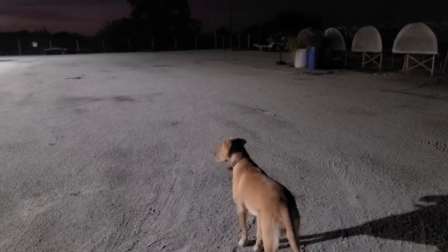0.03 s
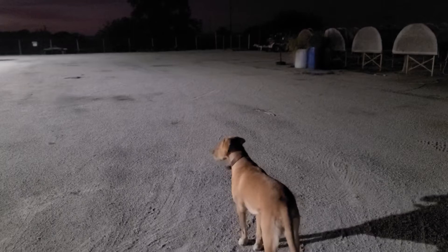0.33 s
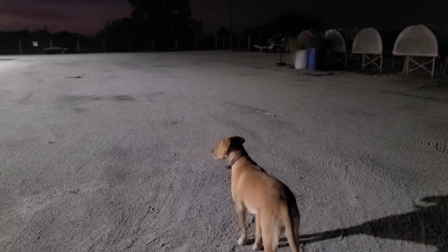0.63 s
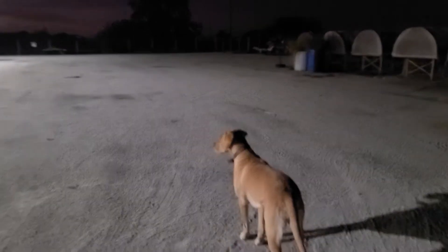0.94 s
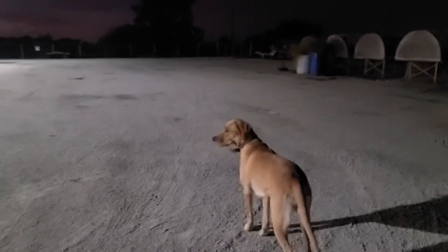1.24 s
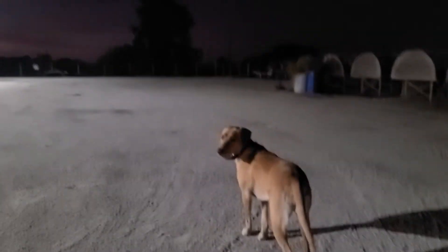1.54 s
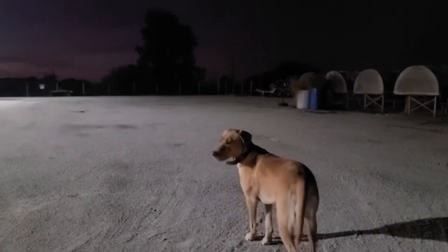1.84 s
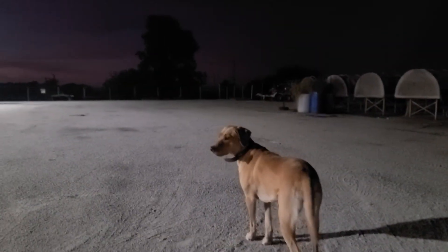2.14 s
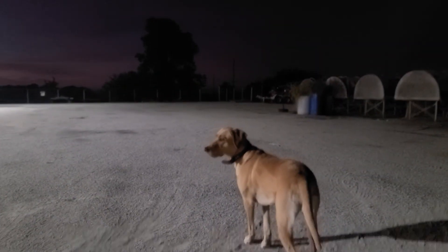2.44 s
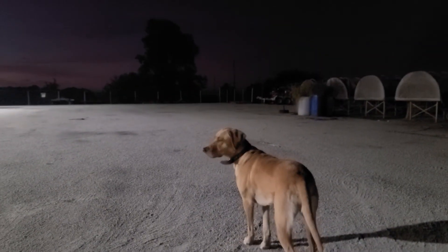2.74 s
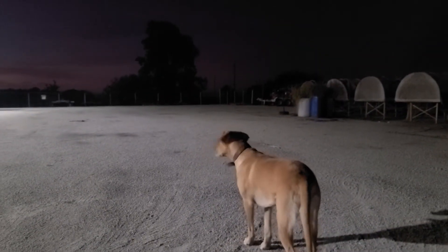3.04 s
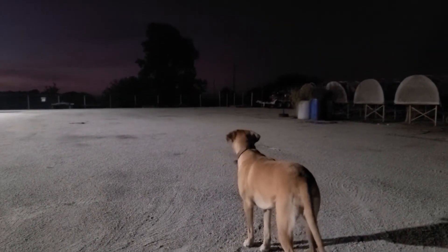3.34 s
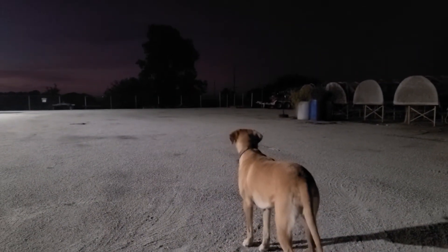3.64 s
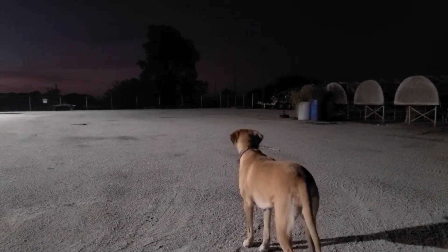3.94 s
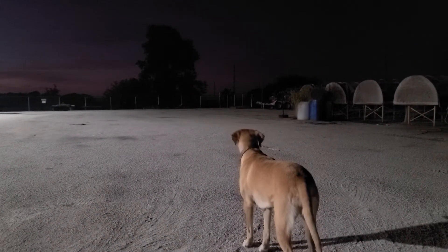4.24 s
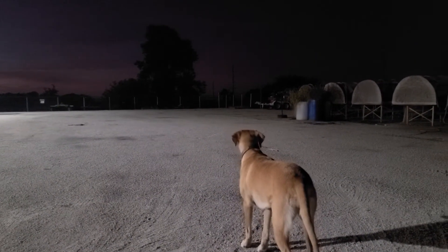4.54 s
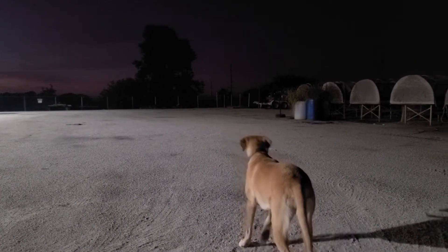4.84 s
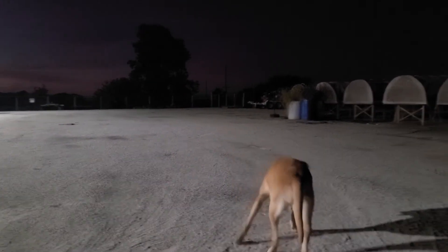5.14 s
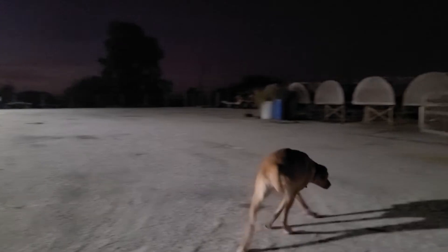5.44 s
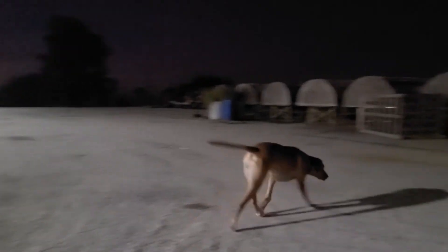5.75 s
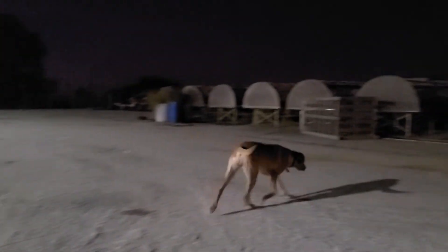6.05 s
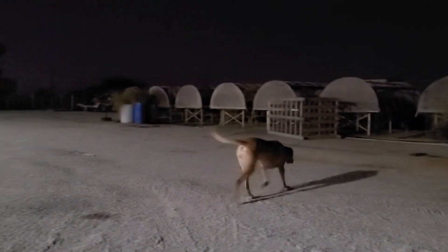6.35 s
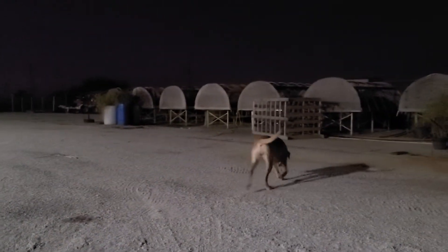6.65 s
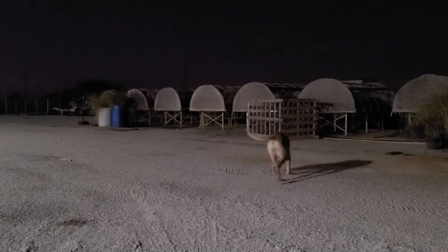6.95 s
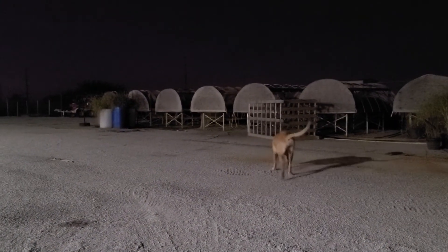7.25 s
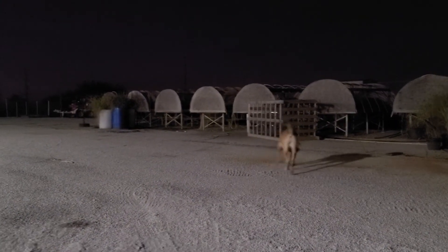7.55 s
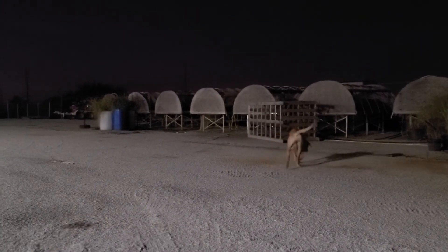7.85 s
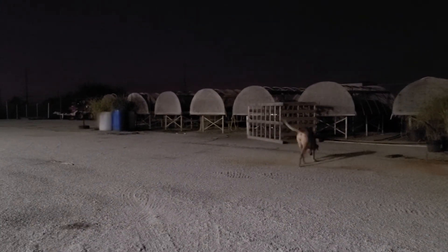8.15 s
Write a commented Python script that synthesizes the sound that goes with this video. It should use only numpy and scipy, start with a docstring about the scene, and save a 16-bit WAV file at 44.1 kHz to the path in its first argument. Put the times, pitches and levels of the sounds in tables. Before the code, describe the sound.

Coyotes yip and yap far off over a night rumble and insects, with microphone bumps, one sharp click and later light gravel steps.

```python
"""A pack of coyotes yips, yaps and howls far off at night. Each call is a voice gliding in pitch,
blurred by the open land; the nearer ones are doubled by an echo. All along, the air rumbles,
a distant motor drones and insects trill with their wings. Now and then comes a thin whistle or whine.
A hand rubs and bumps the microphone, which clicks once, sharply. Later, steps crunch on gravel
as many small stones grind together."""
import sys
import numpy as np
from scipy import signal
from scipy.fft import rfft, irfft
from scipy.io import wavfile
from scipy.ndimage import uniform_filter1d, map_coordinates

SR = 44100
rng = np.random.default_rng(int(sys.argv[2]) if len(sys.argv) > 2 else 0)


def wav_out(sig):
    """Save sig, one row per channel (or a flat mono array), as 16-bit PCM at SR to the path in sys.argv[1]."""
    wavfile.write(sys.argv[1], SR, np.round(np.clip(np.atleast_2d(sig).T, -1, 1) * 32767).astype(np.int16))


N = 369999
RASP_DEPTH, RASP_PER_S = .55, 700   # how deeply and how fast a hoarse voice shakes in strength

# How a coyote's throat and open mouth shape its voice, heard from afar.
# Each row: frequency in Hz, gain in dB.
THROAT = [(400, -20), (700, -9), (1000, -2), (1450, 0), (1750, -4), (2050, -13), (2600, -7), (3200, -13),
          (4500, -26)]


def from_db(db):
    """Turn decibels into a number to multiply a sound by."""
    return 10 ** (np.asarray(db) / 20)


def rms_one(x):
    """Scale a sound so that its average strength (rms) is 1."""
    return x / np.sqrt(np.mean(x ** 2) + 1e-30)


def at_hz(points, hz):
    """Read between the rows of a (frequency, value) table, with octaves evenly spaced."""
    points = np.array(points)
    return np.interp(np.log(hz + 1e-9), np.log(points[:, 0]), points[:, 1])


def drift(rate, size=N):
    """A smooth random wobble, about 1 in size, that changes about rate times a second."""
    knots = rng.standard_normal(int(size / SR * rate) + 4)
    return map_coordinates(knots, [1 + np.arange(size) / SR * rate], order=3, mode="nearest")


def resonate(x, hz, width_hz):
    """Let a sound ring at one pitch: that pitch passes fully and the rest is weakened."""
    radius = np.exp(-np.pi * width_hz / SR)
    angle = 2 * np.pi * min(hz, SR / 2) / SR
    feedback = [1, -2 * radius * np.cos(angle), radius * radius]
    return signal.lfilter(np.array([1, 0, -1]) * (1 - radius * radius) / 2, feedback, x + 1e-18)


def placed(x, pan_db, lag_s):
    """Give a sound a direction: the left is pan_db louder, and the right is lag_s later."""
    late = np.pad(x, (max(round(lag_s * SR), 0), 0))[:len(x)]
    return np.array([x * from_db(pan_db / 2), late * from_db(-pan_db / 2)])


def add(out, start_s, x):
    """Mix a short sound into out at the given time."""
    i = int(np.clip(round(start_s * SR), 0, N))
    out[..., i:i + x.shape[-1]] += x[..., :N - i]


def night_air():
    """Night air and far traffic rumble, with the low notes nearly the same left and right."""
    # The tone of the rumble. Each row: frequency in Hz, level in dB per Hz.
    spectrum = [(20, -78), (35, -78.5), (55, -69), (85, -66.5), (125, -68), (160, -80.5), (270, -84),
                (380, -93.5), (650, -101), (2400, -108), (5000, -108), (6200, -116), (7100, -117),
                (8000, -128), (10000, -124), (12000, -118.5), (15500, -120.5)]
    # How alike left and right are. Each row: frequency in Hz, likeness (1 means the same).
    likeness = [(60, 0.92), (130, 1), (290, 0.54), (640, 0.5), (1500, 1), (3500, 0.38), (15000, 0.13)]
    hz = np.arange(N // 2 + 1) * SR / N
    mid, side = rfft(rng.standard_normal((2, N)))
    alike = np.clip(at_hz(likeness, hz), -1, 1)
    both = np.sqrt(1 + alike) * mid + np.sqrt(1 - alike) * side * [[1], [-1]]
    return irfft(both * from_db(at_hz(spectrum, hz)) * (hz > 15), N) * np.sqrt(SR) / 2


def motor(wander_hz=.55):
    """A distant motor drones on a few low tones that waver in pitch and strength."""
    # The motor's tones. Each row: pitch in Hz, average level in dB.
    tones = [(82.9, -51), (107.2, -52.5), (131, -80), (215, -72.5), (260, -63), (359, -96), (400, -97)]
    out = np.zeros(N)
    for hz, level_db in tones:
        strength = np.sqrt(2) * from_db(level_db + 1.8 * drift(6.4))
        out += strength * np.sin(2 * np.pi * np.cumsum(hz + wander_hz * drift(4.6)) / SR)
    return out


def insects():
    """Each wing stroke sings a note that falls as the wing slows; many singers blend into a hiss."""
    # The trills. Each row: pitch in Hz, width of the band in Hz, level in dB before the last filter,
    # strokes per second, depth of pulsing from 0 to 1, fall in pitch over one stroke in Hz.
    trills = [(3621, 140, -61.5, 41, 0.18, 477), (3624, 305, -64.5, 57, 0.38, 350),
              (3462, 545, -62.5, 49, 0, 186), (4606, 1010, -67, 60, 0.07, 156)]
    out = np.zeros((2, N))
    for hz, width_hz, level_db, per_s, depth, fall_hz in trills:
        stroke = np.cumsum(per_s * (1 + 0.0433 * drift(6))) / SR % 1   # runs 0 to 1 in each stroke
        tone = np.exp(2j * np.pi * np.cumsum(hz + fall_hz * (.5 - stroke)) / SR)
        noise = rng.standard_normal((2, N)) + 1j * rng.standard_normal((2, N))
        slow_noise = signal.sosfilt(signal.butter(2, width_hz / 2, fs=SR, output="sos"), noise)
        rasp = np.real(slow_noise * tone)   # smears the tone into a narrow band
        out += from_db(level_db) * rms_one(rasp * (1 - depth * np.cos(2 * np.pi * stroke)))
    return signal.sosfilt(signal.butter(4, [2400, 6500], "band", fs=SR, output="sos"), out)


def cry(hz, overtones_db, jitter, flutter_db, edge_s=.02, effort=.5):
    """A voice follows the pitch curve hz; jitter shakes its pitch and flutter_db its strength."""
    t = np.arange(len(hz)) / SR
    phase = 2 * np.pi * np.cumsum(hz * (1 + jitter * drift(141.1, len(t)))) / SR
    fade = np.sin(np.pi / 2 * np.clip(np.minimum(t, t[-1] - t) / edge_s, 0, 1))
    push = (hz / hz.max()) ** effort   # the voice is loudest at the top of the glide
    overtones = sum(from_db(db) * np.sin(k * phase) for k, db in enumerate(overtones_db, 2))
    flutter = from_db(flutter_db * drift(65.3, len(t)))
    return np.sqrt(2) * (np.sin(phase) + overtones) * fade * push * flutter


def coyote_voice(hz, rough, waver=.035, overtone_step_db=-10.5):
    """A nearly pure call shaped by the throat; the rougher it is, the more it wavers and rasps."""
    rough = np.clip(rough, 0, 1)
    hz = hz * (1 + rough * waver * drift(38, len(hz)))
    overtones_db = [at_hz(THROAT, k * hz) - at_hz(THROAT, hz) + (k - 1) * overtone_step_db
                    for k in (2, 3)]
    tone = cry(hz, overtones_db, jitter=.008 + rough * .03, flutter_db=1.8 + rough * 3, effort=.8)
    return tone * (1 + rough * RASP_DEPTH * drift(RASP_PER_S, len(hz)))


def sag(length, start_hz, end_hz):
    """The pitch of a howl: held at first, then sinking faster and faster."""
    return start_hz + (end_hz - start_hz) * np.linspace(0, 1, int(length * SR)) ** 1.765


def slide(length, start_hz, end_hz):
    """The pitch of a yip, yap or whistle: it moves fast at first, then levels off."""
    return end_hz + (start_hz - end_hz) * np.linspace(1, 0, int(length * SR)) ** 1.5


def yap(hz):
    """A low, hoarse bark: its unsteady overtones fill the whole range where the throat rings."""
    overtones_db = [at_hz(THROAT, k * hz) - at_hz(THROAT, hz) for k in range(2, 8)]
    tone = cry(hz, overtones_db, jitter=.03, flutter_db=3)
    return rms_one(tone * (1 + RASP_DEPTH * drift(RASP_PER_S, len(hz))))


def arch(length, start_hz, top_hz, end_hz, top_at):
    """The pitch of a yelp: it scoops up, rounds off and breaks downward."""
    progress = np.linspace(0, 1, int(length * SR))
    top_at = np.clip(top_at, .05, .95)
    rise_left = np.clip(1 - progress / top_at, 0, 1)
    fall_done = np.clip((progress - top_at) / (1 - top_at), 0, 1)
    return top_hz + (start_hz - top_hz) * rise_left ** 1.5 + (end_hz - top_hz) * fall_done ** 2.35


def near_calls():
    """Hand out every call of the nearer coyotes as its start time and its sound."""
    # Yelps, from clean to ragged. Each row: start and length in seconds, first, top and last pitch
    # in Hz, place of the top from 0 to 1, level in dB, roughness from 0 to 1.
    yelps = [(.2, 0.13, 1257, 1525, 1450, 0.79, -54, 0.42), (0.237, 0.095, 897, 1003, 990, 0.62, -49.5, 0),
             (.56, 0.078, 882, 1160, 1090, 0.82, -43.5, 0.35),
             (0.647, 0.095, 837, 894, 880, 0.66, -55, 0.17),
             (1.031, 0.18, 1540, 1605, 1040, 0.57, -50, 0.02),
             (1.168, 0.23, 1630, 1675, 1620, 0.33, -61, 0.08),
             (1.381, .12, 1380, 1630, 1600, .95, -59.5, .2), (1.979, 0.31, 721, 795, 761, .18, -64, 0.07),
             (2.767, 0.13, 1130, 1620, 1500, 0.77, -56, 0.25),
             (2.97, 0.14, 1090, 1216, 1120, .8, -61.5, .05),
             (3.199, 0.18, 1200, 1810, 1600, 0.94, -66.5, 0.48),
             (3.528, 0.12, 1503, 1760, 1510, 0.48, -62, 0.6),
             (3.713, .105, 1410, 1607, 940, 0.66, -48, 0.14),
             (3.971, 0.086, 1222, 1366, 1280, 0.64, -56.5, 0.4),
             (3.996, 0.062, 2250, 2276, 2260, .2, -62, 0),
             (4.189, 0.13, 1200, 1610, 1040, 0.78, -48.5, .25),
             (4.22, 0.1, 1487, 1672, 1550, 0.71, -50, 0.27),
             (4.516, 0.12, 1302, 1562, 1360, 0.55, -46.5, .22),
             (4.698, 0.099, 1080, 1464, 1320, .7, -52.5, 0.4),
             (4.831, .065, 1340, 1381, 1250, 0.56, -50, 0.33),
             (4.847, 0.21, 1550, 1843, 1644, 0.52, -63.5, 0.86),
             (5.029, 0.13, 883, 1218, 950, 0.67, -52.5, 0.26),
             (5.23, 0.16, 967, 1010, 952, 0.22, -59, 0.17),
             (5.442, 0.12, 1570, 1685, 1550, 0.52, -60.5, 0.3),
             (5.603, .17, 1610, 1775, 1730, 0.64, -56, .2),
             (5.766, 0.083, 1537, 1670, 1350, 0.47, -45, 0.29),
             (5.814, 0.11, 1659, 1750, 1560, 0.48, -56, 0.52),
             (6.017, 0.21, 1330, 1653, 1590, 0.65, -62, 0.66),
             (6.219, 0.074, 1524, 1550, 1300, .3, -55.5, .15),
             (6.041, 0.092, 1108, 1263, 1210, 0.72, -57.5, 0.15),
             (6.027, 0.16, 718, 836, 800, 0.75, -58, 0.15), (6.188, 0.078, 943, 1048, 1010, 0.9, -48, 0.08),
             (6.31, 0.2, 1484, 1600, 1367, 0.29, -52.5, 0.42),
             (6.52, 0.32, 1480, 1972, 1430, 0.7, -62.5, 0.32),
             (6.682, 0.092, 951, 1005, 960, 0.52, -47, 0.15),
             (6.89, .22, 1390, 1810, 1660, 0.83, -59.5, 0.22),
             (7.164, 0.091, 980, 1160, 937, 0.4, -51.5, .05),
             (7.381, .13, 1620, 1790, 1690, .65, -63.5, .35),
             (7.564, 0.097, 1230, 1402, 1370, 0.55, -63, 0.06),
             (7.869, 0.13, 1397, 1633, 1380, 0.63, -61.5, .2),
             (7.969, 0.11, 1530, 1670, 1450, 0.25, -60.5, 0.17),
             (8.229, 0.1, 1054, 1127, 1020, 0.5, -68, 0)]
    # Light rising yips, short sinking howls and hoarse rising yaps.
    # Each row: start and length in seconds, first and last pitch in Hz, level in dB.
    yips = [(.15, 0.088, 640, 837, -57), (.45, 0.12, 819, 833, -58), (.83, 0.098, 978, 1034, -52.5),
            (.995, 0.04, 970, 1032, -43), (1.93, 0.14, 1120, 1667, -68), (2.38, 0.11, 669, 779, -62.5),
            (2.98, 0.093, 1603, 1775, -65.5), (3.22, 0.09, 597, 800, -58), (3.68, 0.058, 795, 946, -59.5),
            (3.92, 0.097, 666, 729, -62.5), (4.17, 0.075, 983, 1300, -58), (4.4, 0.11, 1130, 1400, -70),
            (4.65, 0.062, 1580, 1863, -60.5), (4.8, 0.07, 602, 882, -63), (5.09, 0.18, 1158, 1850, -56.5),
            (5.12, 0.085, 652, 870, -57), (5.24, 0.11, 625, 851, -62), (5.57, 0.11, 778, 880, -61),
            (5.738, 0.0433, 894, 1155, -45), (6.29, 0.07, 964, 1163, -56), (6.46, 0.15, 696, 891, -61),
            (6.38, 0.078, 1036, 1180, -61), (6.56, 0.1, 1696, 1903, -59), (6.62, 0.13, 1200, 1285, -61.5),
            (6.92, 0.074, 1385, 1420, -61), (7.7, 0.085, 1506, 1790, -63), (7.77, 0.22, 900, 1092, -65),
            (7.82, 0.068, 1630, 1980, -64), (8.13, .11, 1560, 1710, -75.5), (1.9, 0.12, 1000, 1350, -66),
            (4.04, .09, 1600, 1850, -62.5), (3.93, 0.102, 1380, 1573, -65), (.16, .12, 1650, 1860, -63)]
    howls = [(.08, 0.12, 1300, 1140, -54.5), (.67, 0.058, 1460, 1050, -57),
             (1.495, 0.11, 1584, 1037, -59.5), (1.555, 0.084, 1165, 1070, -50),
             (1.69, 0.057, 1190, 930, -46.5), (1.74, 0.082, 996, 939, -51), (1.83, 0.11, 1483, 986, -66),
             (2.11, 0.18, 1543, 1505, -61), (2.5, 0.19, 1452, 1365, -64), (2.52, 0.14, 721.6, 691, -59),
             (4.86, 0.1, 988, 962, -60.5), (5.86, 0.093, 1463, 927, -49.5),
             (6.47, 0.088, 1446, 1036, -52.5), (6.55, 0.094, 1050, 992, -54),
             (6.5, 0.11, 1440, 1255, -57.5)]
    yaps = [(.19, .12, 440, 510, -59), (.55, .11, 477, 586, -60), (1.931, 0.12, 431, 537, -62.5),
            (4.109, 0.094, 472, 591, -58.5), (4.51, 0.097, 468.6, 517, -59), (4.811, 0.069, 380, 466, -59),
            (5.248, 0.13, 430, 482.5, -59), (6.03, 0.127, 370.3, 424, -57), (6.278, 0.12, 473.3, 563, -56),
            (7.38, 0.132, 388.5, 437, -61)]
    for start_s, *shape, level_db, rough in yelps:
        yield start_s, from_db(level_db) * coyote_voice(arch(*shape), rough)
    for start_s, *shape, level_db in yips:
        yield start_s, from_db(level_db) * coyote_voice(slide(*shape), rough=.25)
    for start_s, *shape, level_db in howls:
        yield start_s, from_db(level_db) * coyote_voice(sag(*shape), rough=.1)
    for start_s, *shape, level_db in yaps:
        yield start_s, from_db(level_db) * yap(slide(*shape))


def land_scatter(x, fade_s):
    """Trees and sheds scatter a sound into a tail that fades by 60 dB in fade_s seconds."""
    t = np.arange(SR) / SR
    tail = rng.standard_normal((2, SR)) * from_db(-60 * t / fade_s) * (1 - np.exp(-t / 0.0036))
    return signal.fftconvolve(x[None], rms_one(tail) / np.sqrt(SR), axes=1)[:, :N]


def near_coyotes():
    """Each call arrives from one side, again as an echo, and then scattered by the land."""
    # The direct path and the echo. Each row: delay in seconds, gain in dB,
    # left minus right in dB, usual lag of the right side in seconds.
    paths = [(0, -1.3, -5, .00058), (.04, -4.5, 0, .00045)]
    pack = np.zeros((2, N))
    for start_s, voice in near_calls():
        for delay_s, path_db, pan_db, lag_s in paths:
            own_lag_s = lag_s * (1 + .15 * rng.standard_normal())   # each call has its own spot
            add(pack, start_s + delay_s, placed(voice * from_db(path_db), pan_db, own_lag_s))
    return pack + from_db(-10) * land_scatter(pack[1], fade_s=.22)


def far_coyotes(near, count=170, join_s=.2):
    """Many faint yelps from further off blur together and swell with the nearer voices."""
    pack = np.zeros(N)
    for k, (when, span, height, scoop, drop, top_at) in enumerate(rng.random((count, 6))):
        top_hz = 750 + 1300 * height
        start_hz, end_hz = top_hz * (.85 - .2 * scoop), top_hz * (1 - .2 * drop)
        hz = arch(.07 + .1 * span, start_hz, top_hz, end_hz, .7 + .25 * top_at)
        voice = from_db(at_hz(THROAT, hz) / 2) * coyote_voice(hz, rough=.25)
        add(pack, (k + when) / count * N / SR, voice)
    blur = rms_one(placed(pack, pan_db=-3.5, lag_s=0.0004) + land_scatter(pack, fade_s=0.3))
    near_power = uniform_filter1d(np.mean(near ** 2, axis=0), int(join_s * SR))
    near_strength = np.sqrt(np.abs(near_power))
    swell = (near_strength / from_db(-60)) ** .55   # grows .55 dB for each dB of the nearer voices
    return blur * from_db(-66.5) * swell


def thin_whistles(warbles_per_s=12.8):
    """Thin, high whistles or whines; some warble, others fall and level off."""
    # The whistles. Each row: start and length in seconds, first pitch in Hz,
    # fall and warble as shares of the pitch, level in dB.
    whistles = [(0.497, 0.054, 4530, .005, .028, -64), (0.58, 0.22, 4550, 0.0053, .024, -62.5),
                (5.842, .13, 4150, .07, 0, -66), (6.439, .13, 4070, .05, 0, -65),
                (7.125, .13, 4360, .085, 0, -61), (7.823, .14, 4380, .085, 0, -60)]
    out = np.zeros(N)
    for start_s, length, start_hz, fall, warble, level_db in whistles:
        hz = slide(length, start_hz, start_hz * (1 - fall))
        hz = hz * (1 + warble * np.sin(2 * np.pi * warbles_per_s * np.arange(len(hz)) / SR))
        whistle = cry(hz, overtones_db=[-38], jitter=0.0067, flutter_db=3.5, edge_s=0.038)
        add(out, start_s, from_db(level_db) * whistle)
    return out + from_db(-8) * land_scatter(out, fade_s=0.3)


def scuff(length, crunch_db, hiss_db, crunch_hz, hiss_hz, grains_per_s=1300):
    """Many small grains grind together, making a dull crunch under a bright hiss."""
    size = int(length * SR)
    hits = rng.random(size) < grains_per_s / SR
    grains = hits * from_db(4.5 * np.minimum(rng.exponential(1, size), 3))
    grind = grains * rng.standard_normal((2, size)) * signal.windows.tukey(size, .9)
    crunch = resonate(resonate(grind, crunch_hz, crunch_hz), crunch_hz, crunch_hz)
    hiss = resonate(resonate(grind, hiss_hz, hiss_hz / 2), hiss_hz, hiss_hz)
    return from_db(crunch_db) * rms_one(crunch) + from_db(hiss_db) * rms_one(hiss)


def hand_rubs():
    """The hand scuffs the microphone's case as it shifts its grip."""
    # The rubs. Each row: start and length in seconds, level of the dull part in dB.
    rubs = [(0.86, 0.23, -57), (0.995, 0.1, -55), (1.089, 0.17, -61), (1.29, 0.11, -55.5), (1.398, .3, -61),
            (1.798, 0.25, -67)]
    out = np.zeros((2, N))
    for start_s, length, level_db in rubs:
        add(out, start_s, scuff(length, level_db, level_db - 15.5, crunch_hz=980, hiss_hz=5250))
    return out


def hand_bumps(slip=.14, slip_fade_s=.0025):
    """A finger pushes and slips on the case: a thud, a knock and a tick whose pitch varies by spot."""
    # The touches. Each row: start in seconds, levels of thud, knock and tick in dB, tick pitch in Hz.
    touches = [(0.949, -39, -53.5, -61, 1400), (1.067, -61, -59, -60, 1510), (1.167, -64, -58, -60.5, 2580),
               (1.214, -76, -69, -70, 1900), (1.357, -57.5, -59, -59, 2150), (1.368, -67, -52, -53, 1960),
               (1.426, -55.5, -61, -74, 1500), (1.502, -74, -83, -59, 2600), (1.608, -74, -61, -56, 1370),
               (1.682, -51.5, -49, -43.5, 1500), (1.832, -54.5, -57.5, -70, 1400),
               (1.969, -57.5, -57, -76, 1400), (2.133, -55, -67, -73, 1500), (2.339, -58, -60.5, -76, 1200),
               (2.52, -48, -54.5, -70, 1080), (2.623, -63, -67.5, -81, 1400),
               (3.192, -57.5, -71, -57.5, 1330)]
    # How the case rings, thud first and then knock. Each row: pitch in Hz, width in Hz.
    case_rings = [(365, 150), (720, 350)]
    thud_hz = case_rings[0][0]
    out = np.zeros((2, N))
    t = np.arange(SR // 50) / SR
    for start_s, *levels_db, tick_hz in touches:
        touch = 0
        for (hz, width_hz), level_db in zip([*case_rings, (tick_hz, tick_hz * .5)], levels_db):
            slipping = slip * rng.standard_normal(len(t)) * np.exp(-t / slip_fade_s)
            push = signal.unit_impulse(len(t)) + slipping * np.sqrt(hz / thud_hz)
            soft_finger = signal.butter(3, min(1.8 * hz, SR / 4), fs=SR, output="sos")   # cuts highs
            push = signal.sosfilt(soft_finger, push)
            ring = resonate(resonate(push, hz, width_hz), hz, 2 * width_hz)
            touch = touch + from_db(level_db) * rms_one(ring)
        add(out, start_s, placed(touch, pan_db=13, lag_s=0))
    return out


def click(start_s=1.6814, peak_db=-1.0, turn_degrees=105):
    """One hard snap right by the microphone reaches left and right about a quarter cycle apart."""
    # The snap's very short rings. Each row: pitch in Hz, width in Hz, relative level in dB.
    rings = [(1100, 1500, -22), (3600, 1100, 0), (6300, 600, -16), (8400, 1500, -18), (11700, 1400, -18),
             (14600, 1700, -22)]
    hit = signal.unit_impulse(SR // 20, SR // 200)
    snap = sum(from_db(level_db) * resonate(resonate(hit, hz, width_hz), hz, width_hz)
               for hz, width_hz, level_db in rings)
    turned = np.real(signal.hilbert(snap) * np.exp(-1j * np.radians(turn_degrees)))
    both = np.array([snap, turned])
    out = np.zeros((2, N))
    add(out, start_s - hit.argmax() / SR, from_db(peak_db) * both / np.abs(both).max())
    return out


def gravel_steps():
    """Each step scuffs the gravel; now and then a single stone snaps underfoot."""
    # Steps of shoes and paws. Each row: start and length in seconds, hiss level in dB, hiss pitch in Hz.
    steps = [(5.304, .09, -71.5, 5600), (5.551, .093, -71.5, 7000), (5.778, .18, -73, 5600),
             (6.13, .085, -71, 6200), (6.403, .08, -75, 6000), (6.678, .1, -78, 13000),
             (6.95, .16, -69, 14500), (7.09, .05, -65, 15200), (7.32, .18, -75, 14500)]
    # Snapping stones. Each row: start in seconds, peak level in dB, pitch in Hz.
    stones = [(5.122, -60, 12600), (5.335, -55, 6500), (5.422, -58.5, 8130), (5.617, -45.5, 6500),
              (5.743, -47.5, 5670), (5.817, -53, 6500), (5.838, -57, 7000), (5.868, -59, 7000),
              (5.930, -55, 7400), (6.165, -60, 6500), (6.458, -53, 6550), (6.985, -61, 13500),
              (7.005, -52, 14500), (7.025, -55, 13500), (7.06, -57, 14500), (5.616, -52, 14000),
              (7.103, -34.5, 2310), (7.105, -39.5, 13300), (7.127, -46, 13900), (7.255, -55, 13100),
              (7.612, -60, 13900)]
    out = np.zeros((2, N))
    for start_s, length, hiss_db, hiss_hz in steps:
        add(out, start_s, scuff(length, hiss_db + 6, hiss_db, crunch_hz=1700, hiss_hz=hiss_hz))
    t = np.arange(SR // 20) / SR
    for start_s, peak_db, hz in stones:
        burst = rng.standard_normal((2, len(t))) * np.exp(-t / 0.0069)
        snap = resonate(burst, hz, hz / 2)
        add(out, start_s, from_db(peak_db) * snap / np.abs(snap).max())
    return out


def scene():
    """The pack, the night around it, and the small sounds close by."""
    near = near_coyotes()
    distant = near + far_coyotes(near) + thin_whistles() + insects() + night_air() + motor()
    return distant + hand_bumps() + hand_rubs() + click() + gravel_steps()


def record(dry):
    """The microphone opens after a moment of silence, and the highest treble is cut."""
    open_s, cutoff_hz = .123, 15900
    opened = np.clip((np.arange(N) / SR - open_s) / .002, 0, 1)
    return signal.sosfilt(signal.ellip(10, .1, 80, cutoff_hz, fs=SR, output="sos"), dry * opened)


dry = scene()
out = record(dry)
wav_out(out)
```